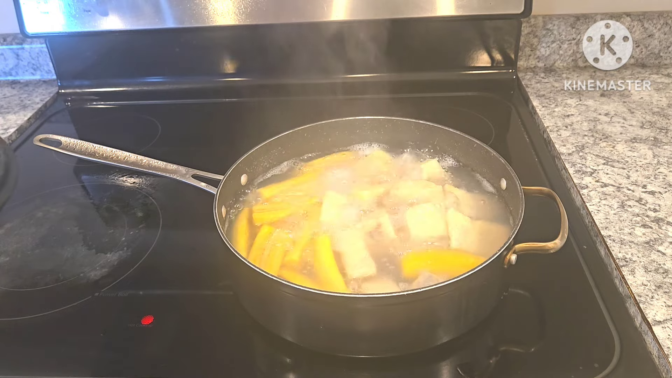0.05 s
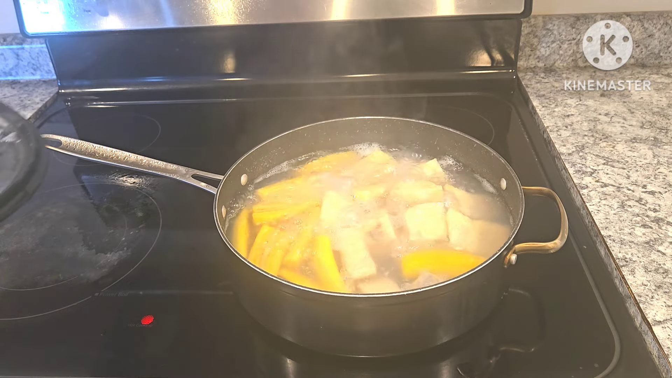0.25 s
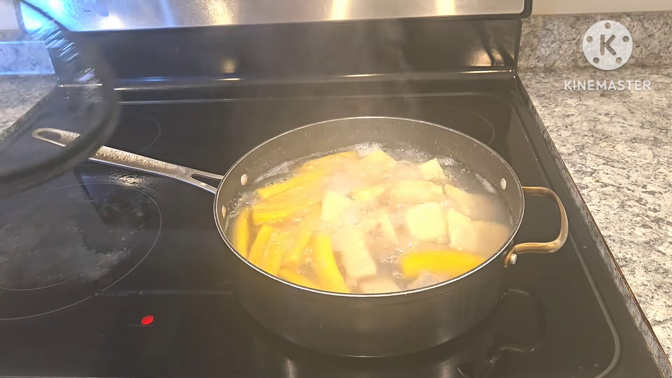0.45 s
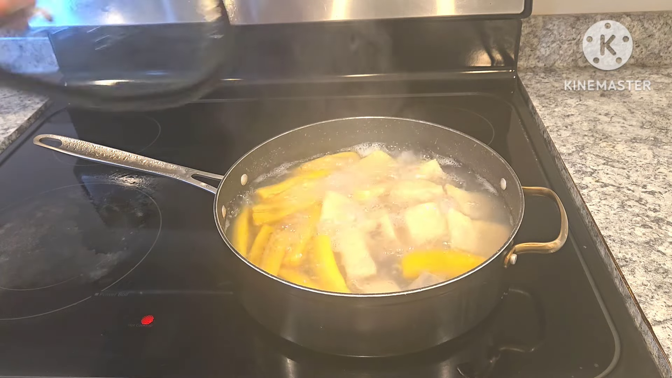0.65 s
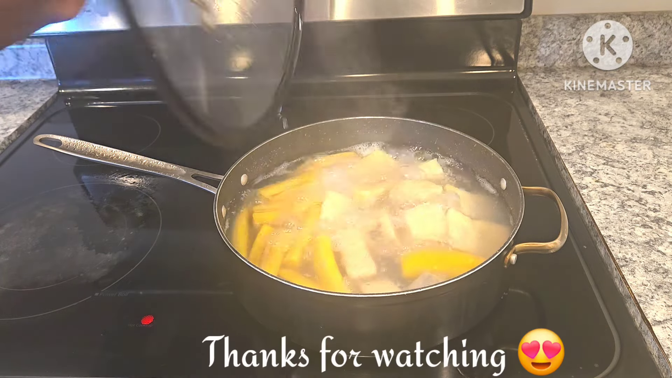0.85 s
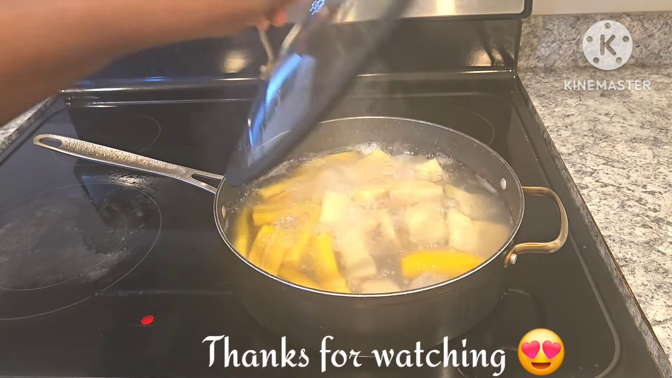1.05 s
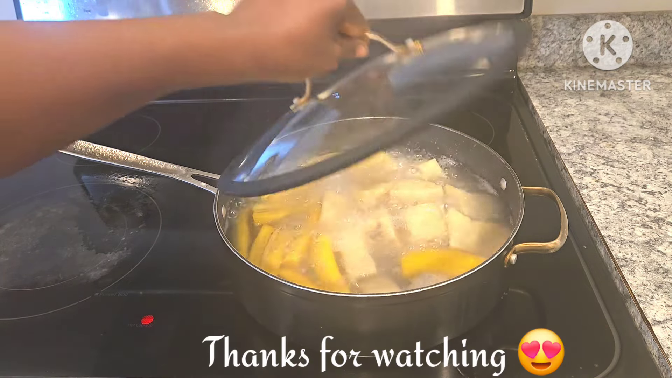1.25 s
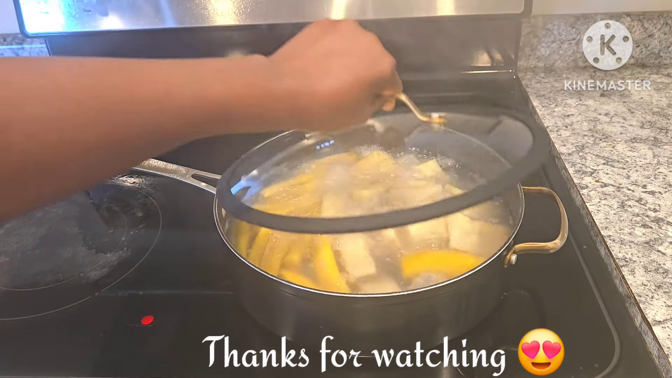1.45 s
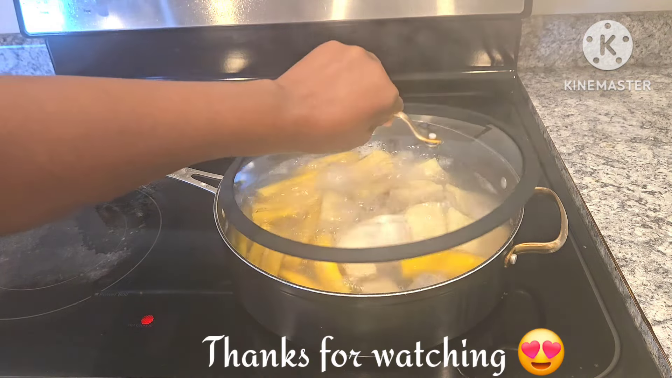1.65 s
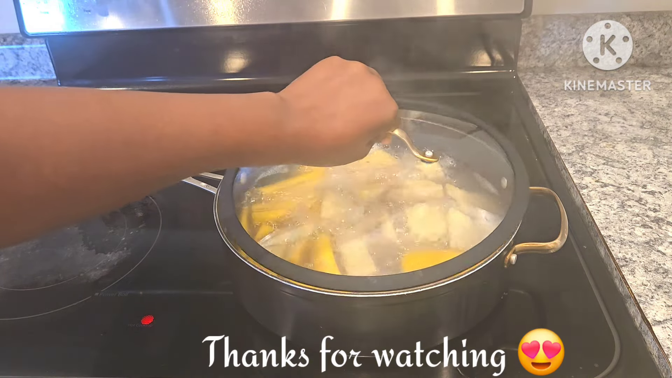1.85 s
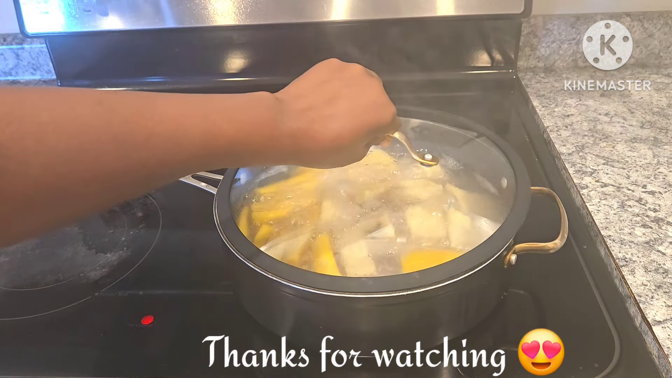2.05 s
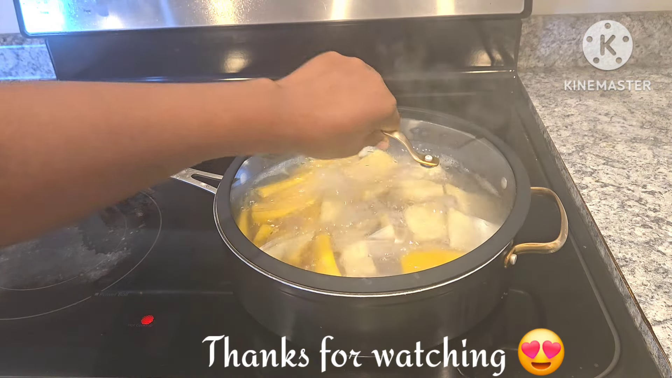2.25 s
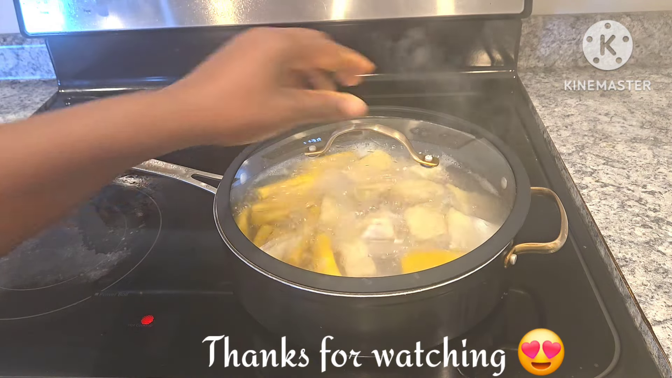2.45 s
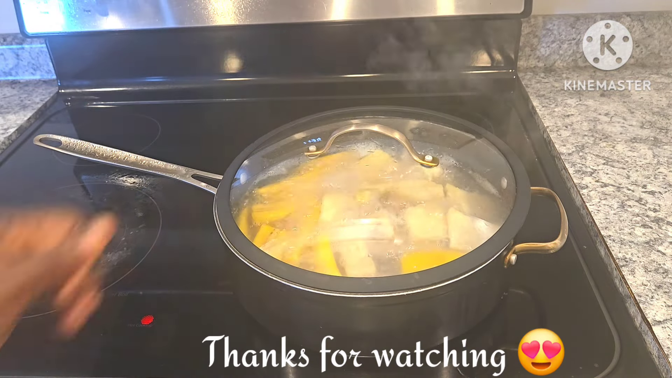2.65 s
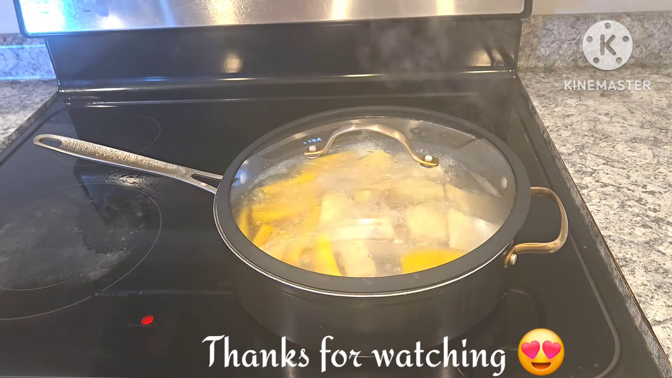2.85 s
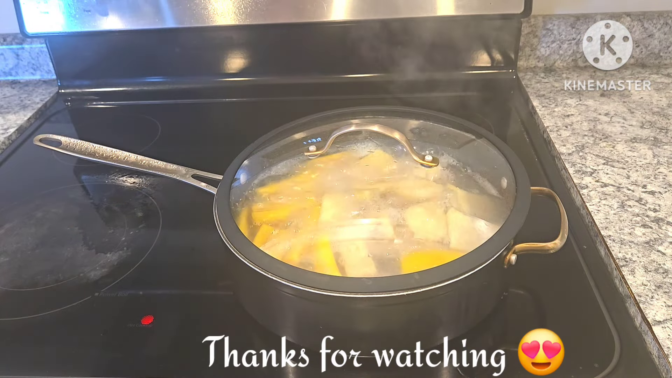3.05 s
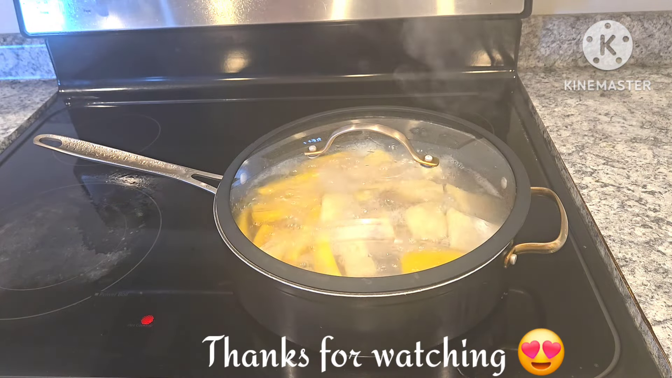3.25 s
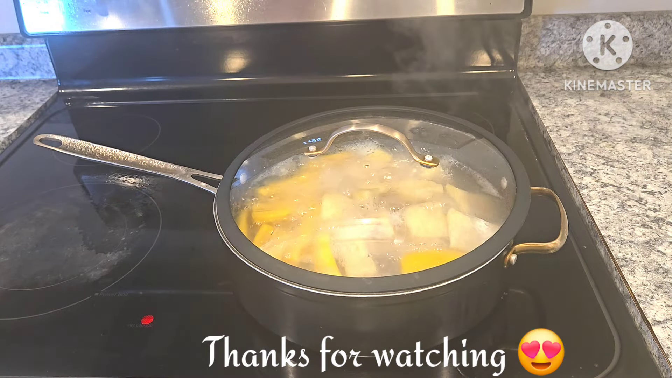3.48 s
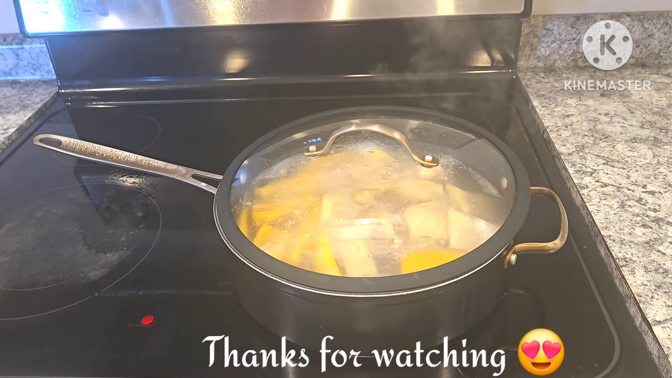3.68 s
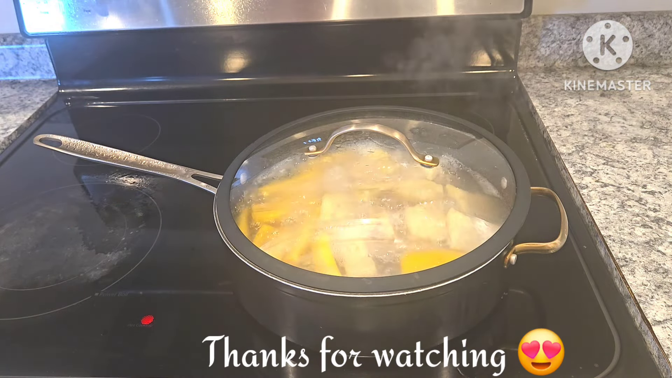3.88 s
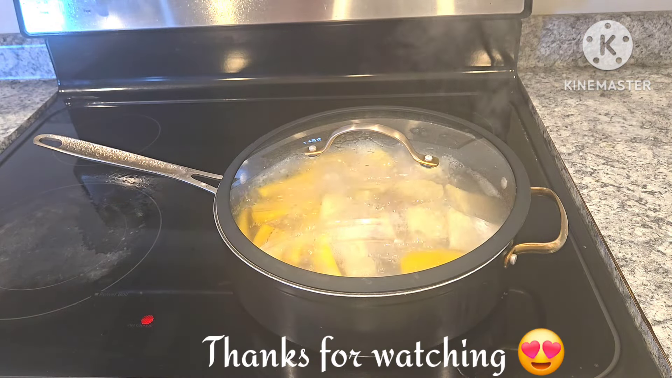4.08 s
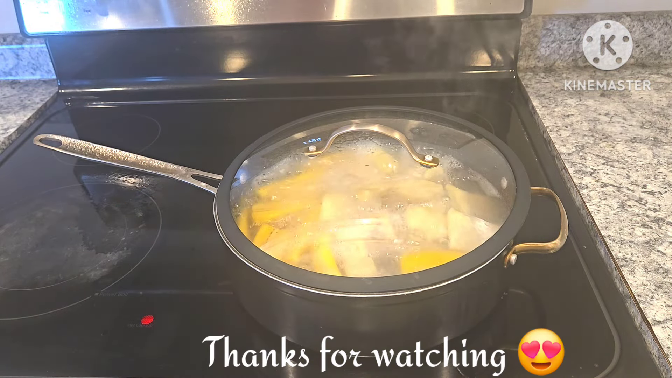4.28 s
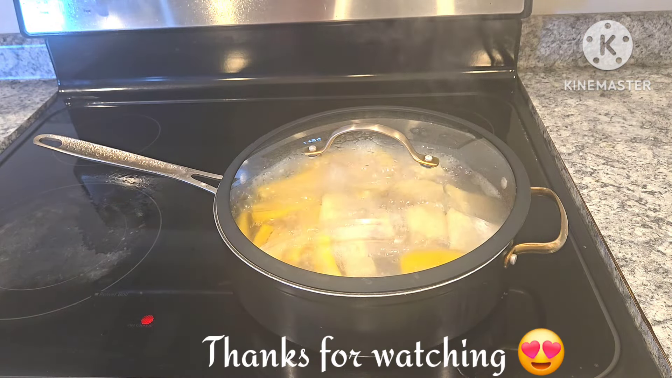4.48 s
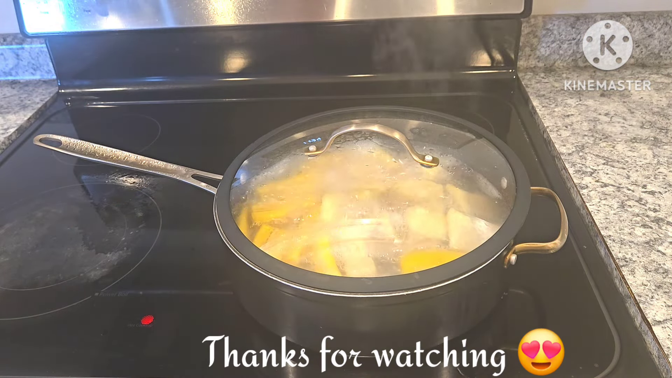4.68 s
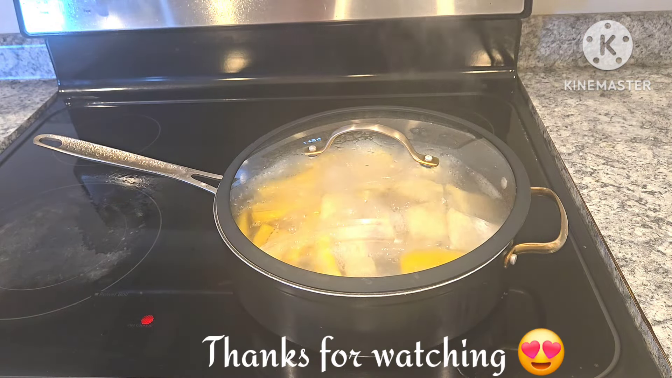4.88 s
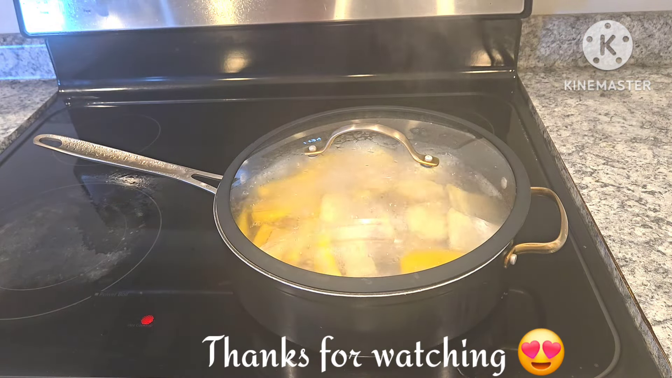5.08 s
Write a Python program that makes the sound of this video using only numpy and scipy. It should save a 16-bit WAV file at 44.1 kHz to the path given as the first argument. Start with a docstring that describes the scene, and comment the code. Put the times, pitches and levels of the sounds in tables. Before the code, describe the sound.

Bright, crackling bubbles in an open pan become dull, hollow glugging once a glass lid is lowered over a faint, pulsing motor hum.

```python
"""Vegetables boil in a wide open pan: bubbles pop, snap and ring in clumps, under hissing spray.
A glass lid comes down; the air in the closing gap rings, and soft rim touches thud through the stove.
Under the lid the trapped air booms at one main pitch, while the pops go dull and the spray fades.
All along, two motors of nearly equal speed hum and beat over soft room noise and a far hiss.
Bubbles are clicks that set resonances or dying sines ringing; spray and room are shaped noise."""
import sys
import numpy as np
from scipy import signal
from scipy.io import wavfile

SR = 44100
rng = np.random.default_rng(int(sys.argv[2]) if len(sys.argv) > 2 else 0)


def wrap_up_sound(samples):
    """Save the sound to the file named by the first command line argument, as 16-bit audio."""
    columns = np.atleast_2d(samples).T
    # keep every value between -1 and 1, then stretch to whole-number steps
    tamed = np.clip(columns, -1, 1)
    steps = np.round(tamed * 32767).astype(np.int16)
    wavfile.write(sys.argv[1], SR, steps)


def decibels_to_gain(level_db):
    """Convert a level in decibels to a linear amplitude gain (20 dB per decade)."""
    exponent = np.asarray(level_db, float) / 20
    return 10 ** exponent


N = 225790


def rms_one(x):
    """Scale to unit rms."""
    return x / np.sqrt(np.mean(x ** 2) + 1e-20)


def in_time(rows):
    """Turn each column of a curve table into one value a sample; the first column is seconds."""
    seconds, *columns = np.transpose(rows)
    return [np.interp(np.arange(N) / SR, seconds, column) for column in columns]


def at_hz(points, hz):
    """Read a spectrum table at one pitch, on a log-frequency axis."""
    table_hz, values = np.transpose(points)
    return np.interp(np.log(hz), np.log(table_hz), values)


def drift(rate_hz):
    """Slow random wandering of rms 1: noise through two low-pass poles, one value every 40 samples."""
    r = np.exp(-80 * np.pi * rate_hz / SR)
    noise = rng.standard_normal(N // 40 + 2002)
    slow = signal.lfilter([1], [1, -2 * r, r * r], noise)[2000:]    # skip the start-up
    return np.interp(np.arange(N) / 40, np.arange(len(slow)), rms_one(slow))


def ring(clicks, hz, width_hz):
    """A unit click sets a dying sine of starting height 1 ringing."""
    r, w = np.exp(-np.pi * width_hz / SR), 2 * np.pi * hz / SR
    return signal.lfilter([0, np.sin(w)], [1, -2 * r * np.cos(w), r * r], clicks + 1e-18)


def resonance_filter(hz, width_hz):
    """Filter weights of a resonance whose gain is 1 at the top."""
    r = np.exp(-np.pi * width_hz / SR)
    return [(1 - r * r) / 2, 0, (r * r - 1) / 2], [1, -2 * r * np.cos(2 * np.pi * hz / SR), r * r]


def resonance(x, hz, width_hz):
    """Let one pitch and its close neighbours through."""
    return signal.lfilter(*resonance_filter(hz, width_hz), x)


def band(x, low_hz, high_hz):
    """Butterworth band-pass."""
    edges_hz = [low_hz, min(high_hz, .45 * SR)]
    return signal.sosfilt(signal.butter(2, edges_hz, "band", fs=SR, output="sos"), x)


def left_right(db):
    """Gains that raise the left and lower the right by db each."""
    return decibels_to_gain(db * np.array([[1], [-1]]))


def clicks_at(rows, db):
    """One click a row, at the row's first column in seconds."""
    out = np.zeros(N)
    out[[round(row[0] * SR) for row in rows]] = decibels_to_gain(db)
    return out


def collapses(per_s, spread_db):
    """Bubbles push outward at random moments with uneven strength; rms 1."""
    sizes = decibels_to_gain(spread_db * np.minimum(rng.exponential(1, N), 3))
    return rms_one(sizes * (rng.random(N) < per_s / SR))


# How alike the two sides of a noise are. Each row: pitch in Hz, likeness from -1 to 1.
LIKENESS = [(60, 0.93), (250, 0.96), (700, -0.37), (2000, -1.08), (4000, 0.069), (15000, -0.22)]
# How noise leans to one side. Each row: pitch in Hz, left over right in dB.
BALANCE_DB = [(60, 5.5), (180, -1.5), (550, 1.5), (1650, -3.5), (4970, 4), (15000, 1)]


def banded_noise(spectrum, patchy_db):
    """Third-octave bands of stereo noise, each with its own level, flicker and likeness."""
    out, edges = 0, 25 * 2 ** np.arange(0, 9.5, 1 / 3)
    white = rng.standard_normal((2, 2, N))
    for k, (low, high) in enumerate(zip(edges, edges[1:])):
        mid, side = band(white[k % 2], low, high)
        hz = np.sqrt(low * high)
        alike = np.clip(at_hz(LIKENESS, hz), -1, 1)
        level_db = at_hz(spectrum, hz) + patchy_db * drift(13.0)
        gain = decibels_to_gain(level_db) * left_right(at_hz(BALANCE_DB, hz) / 2)
        out = out + gain * (np.sqrt(1 + alike) * mid + np.sqrt(1 - alike) * side * [[1], [-1]])
    return out


# Colour of the room noise. Each row: pitch in Hz, relative level in dB per Hz.
ROOM = [(25, -31), (40, -14.5), (60, -17), (95, -13), (140, -0.5), (195, -13), (280, -3.5), (350, -29),
        (440, -13), (680, -32), (900, -21), (2600, -47), (4000, -90)]


def room_noise():
    """Soft low noise of the room, its level set between 60 and 270 Hz."""
    room = banded_noise(ROOM, patchy_db=2.5)
    return decibels_to_gain(-53.5) * room / np.std(band(room, 60, 270))


# Colour of the far hiss. Each row: pitch in Hz, relative level in dB per Hz.
HISS = [(1410, -20), (2400, -9), (2570, 0), (2810, -6.5), (3500, -7.5), (4310, -6), (5580, 1), (8240, 0),
        (9410, -3), (14800, -9.5), (15500, -15)]


def far_hiss():
    """Faint shaped noise, with one narrow band that stands out and slowly wavers."""
    peak = rms_one(resonance(rng.standard_normal((2, N)), hz=8250, width_hz=420))
    peak = decibels_to_gain(-10 + 1.1 * drift(2.3)) * peak
    return decibels_to_gain(-71.5) * rms_one(rms_one(banded_noise(HISS, patchy_db=1.12)) + peak)


# The two motors. Each row: turning speed in Hz, then pairs of (multiple of it, level in dB).
MOTORS = [(55.62, [(1, -60.8), (3, -61), (4, -58.5)]), (59.18, [(1, -58.8), (3, -64.5)])]


def motors():
    """Two steady hums about three and a half hertz apart swell and fade together."""
    t = np.arange(N) / SR - .039    # all the waves crest together at this second
    out = np.zeros(N)
    for hz, orders in MOTORS:
        for order, db in orders:
            out += decibels_to_gain(db) * np.cos(2 * np.pi * order * hz * t)
    return out


def kitchen(x):
    """Short echo of the kitchen: eight feedback delays a side, very slightly duller on every round."""
    t60_s, wall_cut_hz = 0.16, 38000
    out, dull = np.zeros((2, N)), np.exp(-2 * np.pi * wall_cut_hz / SR)
    for k, lag in enumerate((rng.uniform(0.0086, 0.021, 16) * SR).astype(int)):
        loop, gain, state = x.copy(), decibels_to_gain(-60 * lag / SR / t60_s), [0.]
        for i in range(lag, N, lag):
            back, state = signal.lfilter([gain * (1 - dull)], [1, -dull], loop[i - lag:i], zi=state)
            loop[i:i + lag] += back[:N - i]
        out[k % 2] += (loop - x) * (-1) ** (k // 2)    # echoes only, in mixed polarity
    return out


# Soft touches of the rim. Each row: start in seconds, strength in dB.
SET_DOWN = [(1.736, -44), (1.795, -36.5), (1.815, -35.5), (1.829, -36), (1.857, -39), (1.886, -41),
            (1.905, -53), (1.935, -45), (1.963, -54), (2.043, -44), (2.068, -50), (2.1, -52)]
# Tones of pan and stove top. Each row: pitch in Hz, relative level in dB, seconds to fade by 60 dB.
STOVE = [(43, -19, 0.22), (70.2, -8.5, 0.52), (91.5, 3.5, 0.075), (128.6, -3.5, 0.45), (145.5, -9.5, 0.088)]


def lid_set_down():
    """The padded rim lands softly and thuds through pan and stove top."""
    out = 0
    for hz, db, t60_s in STOVE:
        touch_db = np.array(SET_DOWN)[:, 1] + db + rng.normal(0, 1.7, len(SET_DOWN))
        out = out + ring(clicks_at(SET_DOWN, touch_db), hz, np.log(1000) / np.pi / t60_s)
    return band(band(out, 28, 186), 27, 215)    # a soft contact has no edge


def pops(strength, low_hz, high_hz, per_s, cycles):
    """Smaller bubbles ring a few cycles at scattered pitches and places."""
    clicks, dealt = collapses(per_s, spread_db=2.5), rng.integers(0, 16, N)
    place = left_right(0.57 + 2.1 * rng.standard_normal(N))    # the pan leans left
    pitches = np.geomspace(low_hz, high_hz, 16)

    def rings(x):
        return sum(ring(x * (dealt == k), hz, hz / cycles) for k, hz in enumerate(pitches))

    popping = rings(clicks * place * strength) / np.std(rings(clicks))
    return band(popping, .8 * low_hz, 1.2 * high_hz)


# Colour of the spray. Each row: pitch in Hz, relative level in dB per Hz.
SPRAY = [(2500, 5), (4000, 0.5), (7000, -2.5), (11000, -1), (14000, 1), (16000, -6)]
# Spray before the lid shades it. Each row: time in seconds, level in dB.
SPRAY_LEVEL = [(0, -69), (0.36, -63), (0.58, -64), (0.81, -68), (1.21, -68), (1.37, -60.5), (1.61, -64.5),
               (1.79, -64), (1.815, -53.5), (1.87, -58.5), (2.04, -53), (2.25, -66), (5.12, -83)]
# Single spitting droplets, and at 1.813 s a tick as the lid rim lands. Each row: start in seconds, strength in
# dB, pitch in Hz.
SPITS = [(0.1133, -52, 11100), (0.188, -47, 8550), (0.267, -57, 10500), (0.31, -49, 9750),
         (0.3288, -54, 11300), (0.3375, -50, 13000), (0.3647, -49, 10400), (0.4151, -52, 14000),
         (0.4385, -50, 10600), (0.459, -54, 12000), (0.4715, -49, 11300), (0.4845, -49, 11300),
         (0.4954, -49, 11500), (0.509, -48, 11400), (0.5145, -51, 13000), (0.5235, -50, 11500),
         (0.5573, -48, 10300), (0.6406, -56, 10800), (0.6737, -49, 10100), (0.7357, -48, 11900),
         (0.929, -52, 8530), (1.0939, -53, 7040), (1.1772, -50, 8460), (1.2136, -48, 12300),
         (1.287, -48, 7750), (1.3036, -52, 13000), (1.3141, -50, 13100), (1.3382, -45, 13300),
         (1.4255, -42.5, 6230), (1.4534, -43, 11200), (1.4995, -50, 8250), (1.813, -46, 13700)]


def spray(cover, clumps):
    """Fine fizz and crackle off the open water, with single droplets spitting as tiny dying sines; the landing
    lid ticks once the same way."""
    crackle = pops(1, 7500, 14500, per_s=160, cycles=1.8)
    fizz = rms_one(banded_noise(SPRAY, patchy_db=1.8)) + decibels_to_gain(-11.5) * rms_one(crackle)
    fizz = fizz * decibels_to_gain(in_time(SPRAY_LEVEL)[0] + 1.8 * clumps) * (1 - cover)
    t = np.arange(200) / SR
    for (s, db, hz), (pan, sharp) in zip(SPITS, rng.standard_normal((len(SPITS), 2))):
        tick = decibels_to_gain(db) * np.sin(2 * np.pi * hz * t) * np.exp(-t * 7000 * decibels_to_gain(2 * sharp))
        start = round(s * SR)
        fizz[:, start:start + 200] += tick * left_right(2.9 * pan)
    return fizz


# Loud bubble bursts. Each row: start in seconds, boom strength in dB, crackle strength in dB.
BURSTS = [(0.015, -35, -37), (0.116, -29.5, -28), (0.189, -36, -34), (0.22, -28, -30), (0.329, -45, -31.5),
          (0.362, -58, -36.5), (0.418, -50, -30), (0.506, -33.5, -57), (0.576, -36.5, -38),
          (0.64, -42, -33), (0.674, -30, -30.5), (0.7, -37.5, -27), (0.814, -37, -29.5), (0.907, -42, -54),
          (0.975, -29.5, -27.5), (1.054, -29.5, -31), (1.153, -31.5, -46), (1.28, -30, -26),
          (1.341, -40, -28), (1.361, -32.5, -21.5), (1.384, -30, -40), (1.466, -36, -44), (1.549, -28, -31),
          (1.64, -18, -22.5), (1.68, -29, -38), (1.724, -19.5, -47), (1.797, -27, -39), (1.882, -11, -27),
          (1.923, -44, -33.5), (2.035, -23, -51), (2.081, -27, -28), (2.167, -18, -33), (2.211, -16, -31.5),
          (2.274, -11, -48), (2.32, -10, -35), (2.387, -38, -37), (2.488, -39, -31), (2.582, -10, -54),
          (2.647, -39, -39), (2.724, -26, -36), (2.788, -29, -45), (2.837, -31, -31), (2.893, -15, -32.5),
          (3.003, -18, -32), (3.029, -15, -33), (3.092, -36, -37), (3.144, -21, -37), (3.159, -11, -29.5),
          (3.268, -31, -50), (3.305, -21, -35.5), (3.352, -18, -31), (3.441, -9, -34.5), (3.495, -15, -36),
          (3.54, -35, -36), (3.599, -23, -30), (3.621, -13, -34), (3.714, -22, -34), (3.798, -33, -28.5),
          (3.91, -22, -31), (4.017, -6, -30), (4.108, -13, -34), (4.277, -29, -44), (4.294, -9, -35),
          (4.378, -32, -35), (4.447, -8, -32), (4.599, -25, -33), (4.664, -25, -41), (4.849, -34, -32.5),
          (4.892, -26.5, -32), (4.954, -41, -36.5)]


def bursts(share_db, spread_db, simmer_db):
    """Strength of bubbling: the simmer plus each burst, swelling fast and dying soon."""
    t = np.arange(4410) / SR
    shape = np.minimum(t / .002, 1) * np.exp(-(t / .018) ** 2)
    db = np.array(BURSTS)[:, 2] + share_db + spread_db * rng.standard_normal(len(BURSTS))
    burst_power = np.abs(signal.fftconvolve(clicks_at(BURSTS, 2 * db), shape)[:N])
    return np.sqrt(decibels_to_gain(2 * simmer_db) + burst_power)


# Tiny bubbles, thickest as drops run off the lid. Each row: time in seconds, level in dB.
SPLATTER = [(0, -78), (1.0, -76.5), (1.24, -77.5), (1.3, -70), (1.34, -76), (1.38, -63), (1.44, -69),
            (1.52, -92), (1.9, -82.5), (5.12, -87.5)]


def splatter(clumps):
    """Tiny bubbles ring high and briefly."""
    return pops(decibels_to_gain(in_time(SPLATTER)[0] + 2.0 * clumps), 2280, 4500, per_s=900, cycles=3.1)


# Sharp single collapses. Each row: start in seconds, strength in dB.
SNAPS = [(0.028, -31), (0.1057, -26.5), (0.1216, -26), (0.1325, -27), (0.2255, -38), (0.2435, -34),
         (0.2528, -20), (0.2796, -25), (0.328, -27), (0.363, -24), (0.418, -23), (0.5085, -18),
         (0.5826, -40), (0.6465, -31), (0.8174, -38), (0.877, -47), (0.909, -40), (0.9698, -26),
         (0.977, -43), (1.0064, -21), (1.01, -22), (1.05, -25), (1.227, -28), (1.275, -39), (1.32, -28),
         (1.345, -24), (1.366, -25), (1.367, -29), (1.385, -25.5), (1.395, -32), (1.4677, -25),
         (1.559, -27), (1.635, -19), (1.641, -36), (1.726, -35), (2.176, -36)]


def snaps():
    """A collapse is a blunt outward snap about a millisecond long; weaker ones stutter in every burst."""
    stutter = (rng.random(N) < 260 / SR) * decibels_to_gain(0.99 * rng.standard_normal(N))
    stutter = stutter * bursts(share_db=-4.0, spread_db=0, simmer_db=-54.0)
    blows = clicks_at(SNAPS, np.array(SNAPS)[:, 1]) + stutter
    return band(band(ring(blows, 900, 1100), 150, 2800), 100, 2600)


def pitched(rows, t60s, rise, attack_s, rebound_s, rebound_db, spread_db):
    """A bubble rings as a dying sine of climbing pitch, then rebounds once, a little off pitch."""
    out, t = np.zeros((2, N + 9999)), np.arange(8820) / SR
    chances = rng.standard_normal((len(rows), 3))
    for (s, level_db, pitch), t60, (pan, wait, detune) in zip(rows, t60s, chances):
        place = left_right(0.57 + spread_db * pan)    # the pan leans left
        rebound = (rebound_s * decibels_to_gain(2.0 * wait), pitch * (1 + 0.06 * detune), rebound_db)
        for late_s, hz, db in (0, pitch, 0), rebound:
            fade = decibels_to_gain(level_db + db - 60 * t / t60) * np.minimum(t / attack_s, 1)
            tone = np.sin(2 * np.pi * hz * t * (1 + rise * t)) * fade
            start = round((s + min(late_s, .02)) * SR)
            out[:, start:start + 8820] += tone * place
    return out[:, :N]


# Single bubbles with a clear pitch. Each row: start in seconds, strength in dB, pitch in Hz.
PLINKS = [(0.021, -52, 660), (0.0214, -50, 1530), (0.046, -40.5, 1610), (0.105, -48, 1020),
          (0.119, -27, 936), (0.148, -38, 1380), (0.188, -34, 926), (0.2222, -37, 1660),
          (0.225, -29.5, 977), (0.277, -33, 1490), (0.326, -42, 644), (0.365, -34.5, 960),
          (0.4195, -28, 1760), (0.439, -37.5, 666), (0.4874, -42, 1260), (0.508, -35, 1430),
          (0.507, -37, 684), (0.5511, -37, 1400), (0.581, -33, 1720), (0.644, -36.5, 660),
          (0.713, -33, 990), (0.734, -34.5, 940), (0.876, -35.5, 890), (0.907, -47, 750), (0.97, -36, 930),
          (0.9768, -30.5, 1850), (0.995, -33, 950), (1.05, -40, 1520), (1.076, -33, 1120),
          (1.101, -39.5, 2730), (1.1022, -34.5, 1860), (1.154, -40, 1270), (1.175, -37, 1680),
          (1.207, -35.5, 1570), (1.271, -37, 1380), (1.2926, -29.5, 1620), (0.977, -42, 2700),
          (1.2926, -41, 2900), (1.316, -50, 2750), (1.3453, -47, 3500), (1.3623, -34, 2570),
          (1.3625, -40, 4000), (1.409, -49, 3300), (1.428, -43, 4000), (1.638, -49, 2100),
          (1.7245, -32, 524), (1.886, -38, 500), (1.311, -40, 855), (1.3855, -29.5, 2160),
          (1.3868, -30, 1640), (1.466, -30.5, 630), (1.555, -29.5, 1070), (1.6354, -39, 1520),
          (1.635, -43, 2600), (1.643, -46, 2780), (1.722, -38, 1020), (1.885, -33.5, 1180),
          (1.925, -40, 1470), (2.046, -29.5, 1000), (2.0482, -38, 1490), (2.098, -38, 1010),
          (2.177, -52, 950), (2.219, -36, 940), (2.26, -35.5, 856), (2.2858, -40.5, 1790),
          (2.365, -38.5, 924), (2.498, -48, 1490), (2.509, -48, 900), (2.591, -45, 1510), (2.59, -39, 875),
          (2.705, -48, 910), (2.756, -48, 950), (2.799, -44, 1510), (2.801, -42, 940), (2.863, -44, 960),
          (2.898, -40, 970), (2.938, -37, 1070), (3.003, -48, 880), (3.138, -43, 931), (3.159, -35.5, 980),
          (3.279, -40, 980), (3.441, -44, 830), (3.458, -40.5, 870), (3.5048, -45.5, 1920),
          (3.5665, -48, 1410), (3.594, -45, 900), (3.624, -40, 870), (3.71, -43.5, 860), (3.8, -44, 920),
          (3.805, -54, 1970), (3.806, -57, 2930), (3.808, -58, 2600), (3.949, -35.5, 930),
          (3.972, -52, 1840), (4.018, -36, 900), (4.027, -38.5, 904), (4.0618, -41, 1380),
          (4.141, -49, 920), (4.205, -44, 904), (4.2145, -43.5, 1390), (4.281, -36.5, 920),
          (4.376, -40.5, 820), (4.409, -42.5, 880), (4.448, -40, 900), (4.467, -36.5, 820),
          (4.568, -47, 860), (4.621, -42, 940), (4.673, -38, 880), (4.73, -43, 865), (4.794, -41, 865),
          (4.8122, -43.5, 1800), (4.852, -46, 895), (4.895, -39, 870), (4.928, -40, 890),
          (4.955, -47, 1770), (4.98, -50, 1800), (5.001, -41.5, 940), (5.065, -39, 850)]


def plinks():
    """Small bubbles ring on a clear pitch; the higher the pitch, the sooner they die."""
    ring_s = 0.017 * (1000 / np.array(PLINKS)[:, 2]) ** 0.75    # 0.017 s at 1 kHz
    return pitched(PLINKS, ring_s, rise=0.47, attack_s=0.0014, rebound_s=0.0055,
                   rebound_db=-3.5, spread_db=2.5)


# Big bubbles on the pan base. Each row: start in seconds, strength in dB, pitch in Hz.
THUDS = [(0.235, -41.5, 128), (0.323, -39, 131), (0.442, -43, 136), (0.598, -56, 137), (0.987, -48, 175),
         (1.461, -46, 168), (1.723, -56, 128), (1.816, -41, 116), (1.934, -46, 127), (1.984, -32, 141),
         (2.006, -45, 138), (2.836, -41, 145), (3.108, -48, 129), (3.71, -43.5, 147), (4.111, -51, 132),
         (5.054, -45.5, 157)]


def thuds():
    """Big bubbles thud on the pan base as slow, low dying sines."""
    return pitched(THUDS, np.full(len(THUDS), .16), rise=0.13, attack_s=0.0062, rebound_s=0.00943,
                   rebound_db=1.5, spread_db=1.5)


# Air in the gap between lid and rim. Each row: time in seconds, low and high pitch in Hz, drive in dB.
GAP = [(1.35, 521, 1120, -2), (1.5, 533, 1100, -5), (1.64, 496, 1060, 1), (1.73, 515, 1080, 4.5),
       (1.9, 496, 1224, -4), (1.96, 428, 1060, 5.5), (2.03, 393, 960, -11), (2.15, 382, 930, -29)]


def gap_air(simmer_db):
    """Bubbles set the air in the closing gap ringing; its two pitches sink as the lid seats."""
    low_hz, high_hz, db = in_time(GAP)
    drive = collapses(per_s=350, spread_db=6.0) * bursts(4.7, 1.8, simmer_db) * decibels_to_gain(db)
    out = np.zeros(N)
    for hz, width_hz, gain in (low_hz, 29, 1), (high_hz, 111, -decibels_to_gain(-10.5)):
        state = np.zeros(2)
        for i in range(round(GAP[0][0] * SR), round(GAP[-1][0] * SR), 128):    # retune every 128 samples
            part, state = signal.lfilter(*resonance_filter(hz[i], width_hz), drive[i:i + 128], zi=state)
            out[i:i + 128] += gain * part
    return out


# Air and glass under the lid. Each row: pitch in Hz, width in Hz, relative level in dB.
LID_AIR = [(634, 86, -12), (904, 92, 1), (1120, 190, -8), (1522, 168, -3), (1850, 78, -7), (2032, 35, -3.5),
           (2600, 29, -17.5)]


def under_lid(x, cover):
    """The lid passes only its own resonances; the uncovered share stays clear."""
    shut = 0
    for k, (hz, width_hz, db) in enumerate(LID_AIR):
        shut = shut + decibels_to_gain(db) * resonance(x, hz, width_hz) * (-1) ** k
    return (1 - cover) * x + cover * decibels_to_gain(3.0) * shut


# Big bubbles that set the trapped air ringing. Each row: start in seconds, strength in dB, pitch in Hz.
GLUGS = [(1.882, -37, 350), (1.924, -44, 345), (1.971, -43, 351), (2.009, -33, 349), (2.046, -29, 359),
         (2.085, -26, 348), (2.175, -33, 383), (2.221, -31.5, 343), (2.276, -38, 329), (2.323, -38, 314),
         (2.397, -35, 362), (2.434, -36, 360), (2.469, -37, 347), (2.495, -38, 347), (2.543, -42, 345),
         (2.585, -26.5, 332), (2.699, -39, 352), (2.731, -30, 336), (2.777, -34, 346), (2.843, -30.5, 355),
         (2.894, -29.5, 358), (2.936, -41, 367), (3.036, -35, 366), (3.097, -45, 360), (3.14, -35.5, 340),
         (3.165, -32, 369), (3.256, -38.5, 326), (3.31, -38, 355), (3.335, -36.5, 356), (3.364, -30, 334),
         (3.435, -36, 347), (3.454, -37, 352), (3.489, -38, 356), (3.602, -31, 355), (3.626, -37.5, 350),
         (3.715, -47, 353), (3.742, -44, 348), (3.806, -33.5, 340), (3.856, -35, 340), (3.915, -27.5, 348),
         (3.964, -37, 336), (4.022, -24, 346), (4.107, -35.5, 368), (4.131, -41, 356), (4.188, -40, 339),
         (4.279, -33, 341), (4.3, -33, 351), (4.381, -35.5, 334), (4.414, -39, 359), (4.441, -34, 336),
         (4.47, -42.5, 341), (4.506, -32, 343), (4.598, -37, 352), (4.667, -35.5, 349), (4.766, -39, 339),
         (4.789, -42.5, 355), (4.851, -36, 357), (4.891, -38, 336), (4.951, -40, 363), (4.976, -38, 356),
         (5.025, -45, 354), (5.068, -40, 375)]


def glugs():
    """Big bubbles under the lid ring the trapped air as long dying sines."""
    return pitched(GLUGS, np.full(len(GLUGS), .1), rise=0.32, attack_s=0.0032, rebound_s=0.01198,
                   rebound_db=-9.0, spread_db=1.2)


# Air over the water. Each row: pitch in Hz, width in Hz, relative dB open, half covered and covered.
PAN_AIR = [(256, 30, -7, -11, -11), (326, 20, -6, -9, -7), (347, 26, 1, -7, 0), (378, 45, -8, -4, -7),
           (502, 26, -6, -2, -19), (600, 60, -16, -12, -34)]


def boom(simmer_db, cover):
    """Big bubbles thump the air over the water; the lid shifts its strength to one main pitch."""
    simmer, out = collapses(per_s=300, spread_db=-0.5) * decibels_to_gain(simmer_db), 0
    for k, (hz, width_hz, *dbs) in enumerate(PAN_AIR):
        thumps = clicks_at(BURSTS, np.array(BURSTS)[:, 1] + rng.standard_normal(len(BURSTS)))
        thumps = thumps * decibels_to_gain(-27.0 * cover ** 2)    # the lid damps the thumps
        heave = ring(thumps + simmer, hz, 165.0)    # a bubble heaves for a few cycles
        air_db = np.interp(cover, [0, .5, 1], dbs) + 8.0
        out = out + resonance(heave * decibels_to_gain(air_db), hz, width_hz) * (-1) ** k
    return out * left_right(1.2)


# Strength of the simmer between bursts. Each row: time in seconds, change in dB.
VIGOUR = [(0, -1), (0.4, 2.5), (0.8, -1.5), (1.2, 0), (1.37, 7.5), (1.6, 1.5), (1.9, 5), (2.25, 1.5),
          (2.6, 0), (2.9, 4.5), (3.2, -3), (3.9, -0.5), (4.3, -2), (4.8, 0), (5.12, 3.5)]


def boiling_pan(cover, clumps):
    """Bubbles of all sizes sound together, shaped by how far the lid covers the water."""
    vigour_db = in_time(VIGOUR)[0]

    def simmer_db(open_db, covered_db):
        return vigour_db + np.interp(cover, [0, 1], [open_db, covered_db])

    pop_strength = bursts(-19, 1, simmer_db(-53.5, -59) + 2.6 * clumps)
    plink_strength = bursts(-26.5, 1, simmer_db(-61, -66) + 2.0 * clumps)
    small = pops(pop_strength, 600, 1300, per_s=600, cycles=4.0)
    small = small + pops(plink_strength, 1159, 2570, per_s=900, cycles=8.0)
    pan = boom(simmer_db(-73, -59) + 1.3 * clumps, cover) + under_lid(small + snaps(), cover)
    pan = pan + splatter(clumps) + plinks() + glugs()
    # the lid cancels a band just below the boom
    pan = pan - cover * .85 * resonance(pan, hz=304, width_hz=30)
    pan = pan + gap_air(vigour_db - 32.0 + clumps) + thuds()
    pan[1] = np.roll(pan[1], 2)    # the pan is a little nearer the left: right comes 2 samples later
    return pan


# How far the lid covers the pan. Each row: time in seconds, covered share from 0 to 1.
COVER = [(0, 0), (1.5, 0.16), (1.63, 0.57), (1.8, 0.57), (2.0, 0.93), (2.2, 0.89), (5.12, 0.83)]


def scene():
    """Pan close by, kitchen around it."""
    cover = np.clip(in_time(COVER)[0], 0, 1)
    clumps = drift(16.5)    # bubbles of all sizes come in clumps
    pan = boiling_pan(cover, clumps)
    echo = decibels_to_gain(-15) * kitchen(band(pan.mean(axis=0), 454, 16000))
    low = (lid_set_down() + motors()) * left_right(.7)
    return pan + echo + spray(cover, clumps) + low + room_noise() + far_hiss()


def roll_off(x):
    """The treble ends steeply here."""
    return signal.sosfilt(signal.butter(12, 15700, fs=SR, output="sos"), x)


def record(dry):
    """Small microphones lose the deep bass; a steep filter cuts the top treble."""
    mix = signal.sosfilt(signal.butter(2, 30.0, "high", fs=SR, output="sos"), dry)
    mix = signal.sosfilt(signal.cheby2(12, 50, 15750, fs=SR, output="sos"), mix)
    return roll_off(mix)


dry = scene()
out = record(dry)
wrap_up_sound(out)
```